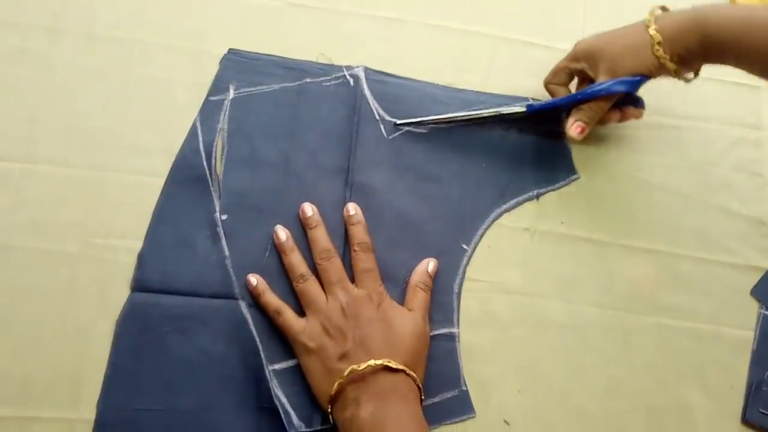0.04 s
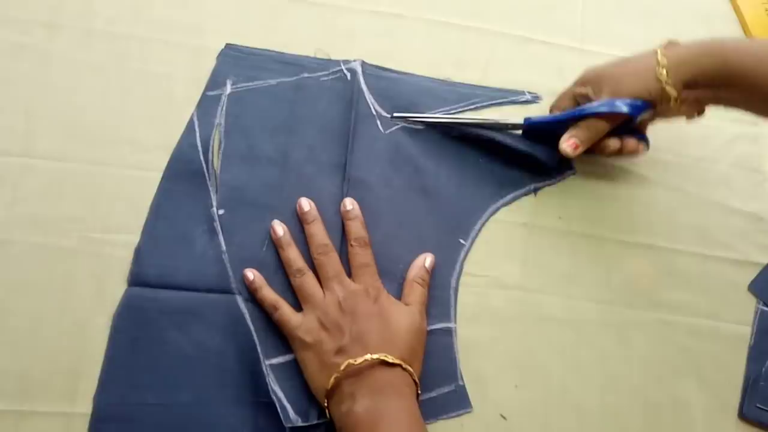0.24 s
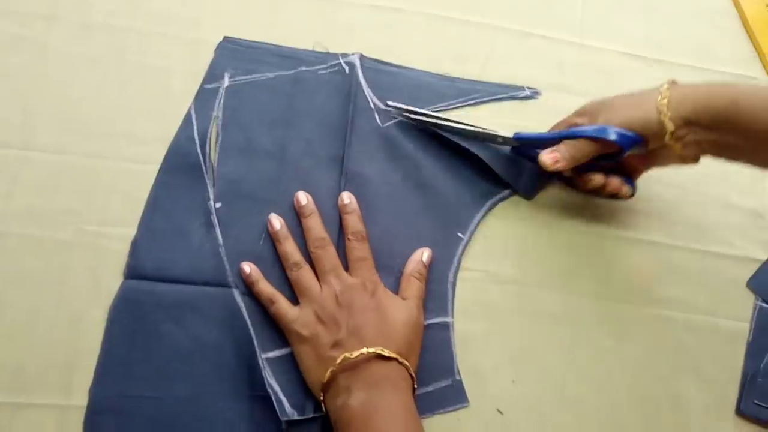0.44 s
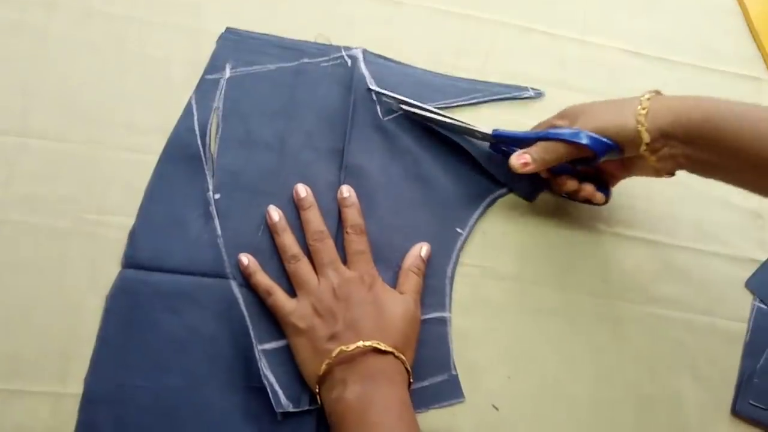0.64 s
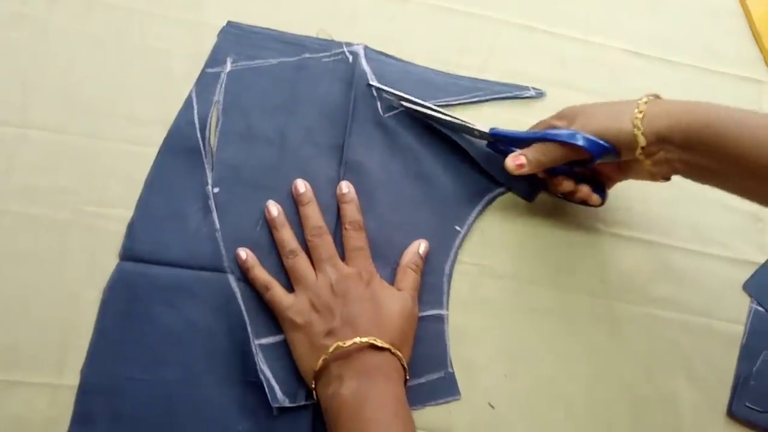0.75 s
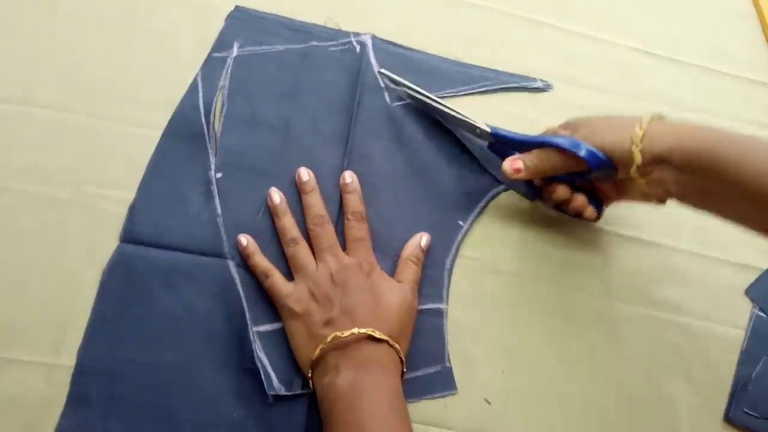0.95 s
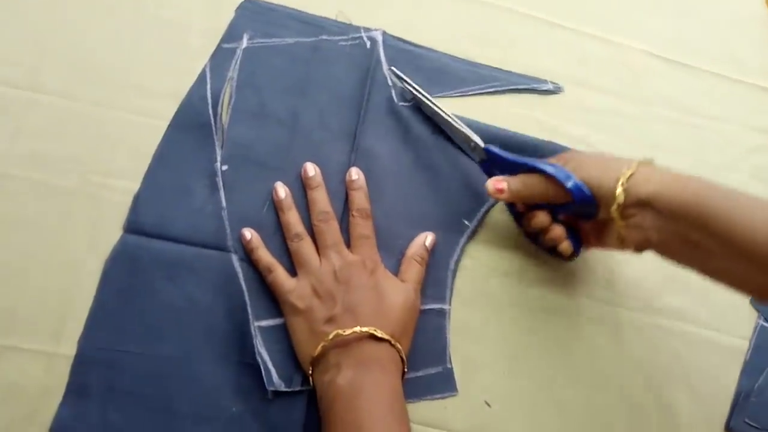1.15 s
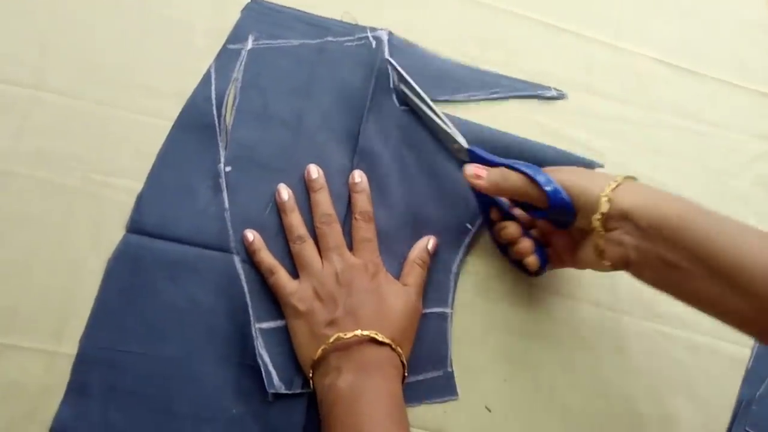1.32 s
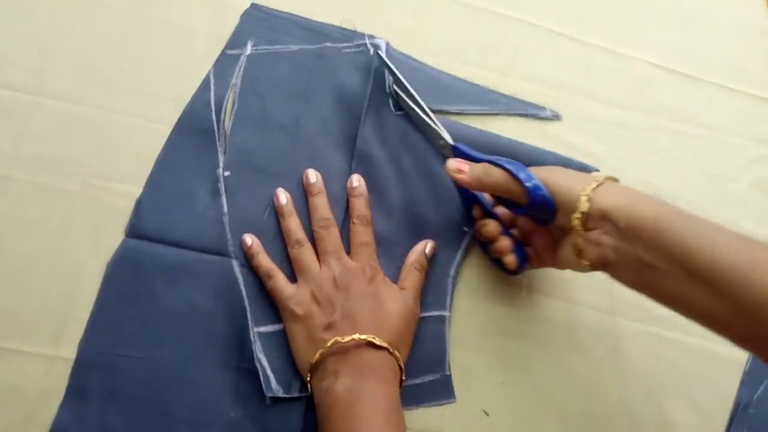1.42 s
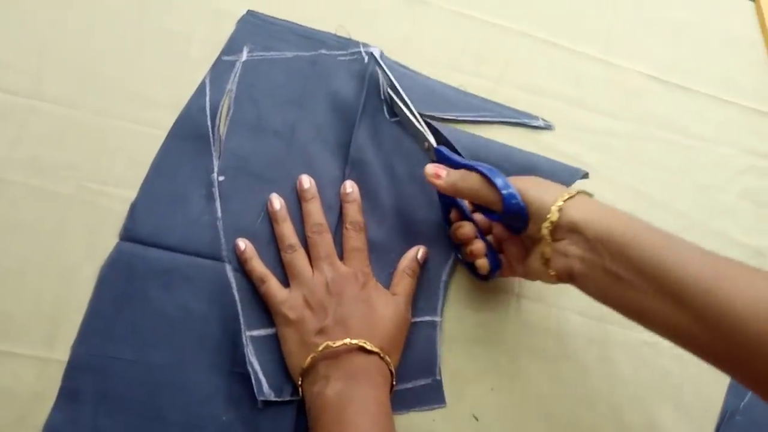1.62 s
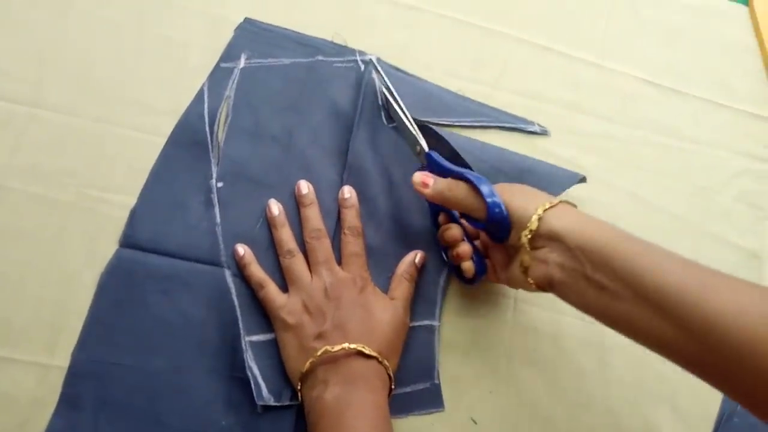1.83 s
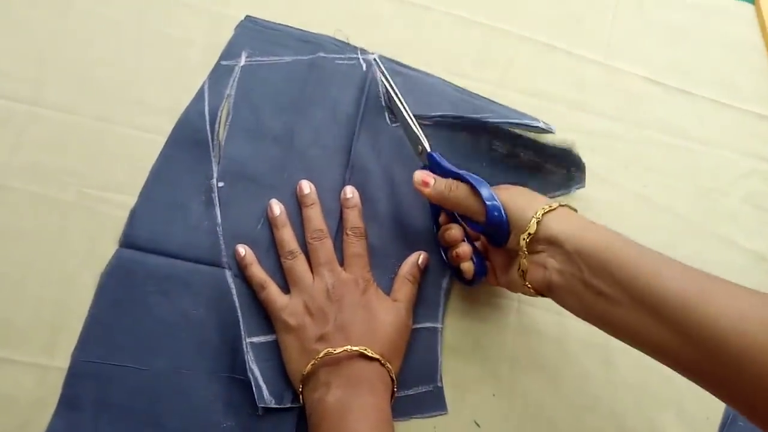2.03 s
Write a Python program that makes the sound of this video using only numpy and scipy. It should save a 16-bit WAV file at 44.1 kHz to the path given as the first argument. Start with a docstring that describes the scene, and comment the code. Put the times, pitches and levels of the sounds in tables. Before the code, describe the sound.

Scissors cutting cloth on a wooden table: a quick flurry of crunchy snips and knocks, a pause, then two more clusters with soft thumps, heard close in a quiet room over low rumble and thin hiss.

```python
"""First comes a quick flurry of crunchy snips and knocks: scissors cut cloth on a wooden table in a quiet room.
Each bite is a short burst of snapping threads that rings the steel and knocks the table top.
Hard slips tick and knock, opening blades rasp, and soft pushes thump the table; a rub and a whistle are faint.
Flickering bands of noise make the rumble of table and room and the thin hiss behind it all."""
import sys
import numpy as np
from scipy import signal
from scipy.fft import rfft, irfft
from scipy.io import wavfile
from scipy.ndimage import uniform_filter1d

SR = 44100
rng = np.random.default_rng(int(sys.argv[2]) if len(sys.argv) > 2 else 0)


def nominal_scale(level):
    """Amplitude ratio for a level in decibels (scalar or array-like)."""
    x = np.asarray(level, float) / 20
    return 10 ** x


def unload_audio(sound):
    """Save the sound as a 16-bit wav file, at the path given as the first command line argument."""
    columns = np.transpose(np.atleast_2d(sound))
    # keep every value between -1 and 1, then stretch to whole-number steps
    steps = np.round(np.clip(columns, -1, 1) * 32767)
    wavfile.write(sys.argv[1], SR, steps.astype(np.int16))


N = 91507  # length of the scene in samples

# hiss of cloth and room, part above the split: t/s, level/dB
HISS_LEVELS = [(0.0, -74), (0.44, -74.5), (0.65, -77), (0.71, -69.5), (0.9, -69.5), (1.2, -69.5),
               (1.42, -67.5), (1.65, -69.5), (1.78, -65.5), (2.07, -66.5)]
# hiss, lower edge below the split: t/s, level/dB
HISS_EDGE_LEVELS = [(0, -75), (.3, -86.5), (.42, -83.5), (.66, -84.5), (.69, -75.5), (.88, -73.5),
                    (1.2, -80), (1.3, -82), (1.35, -74.5), (1.52, -81), (1.59, -88), (1.68, -74),
                    (1.8, -71.5), (2.07, -74)]
# tone colour of the hiss: f/Hz, relative level per Hz/dB
HISS_COLOUR = [(2300, -20), (2780, -7), (3300, -13), (4000, -3), (4870, 0), (6000, -9.5), (6500, -31.5),
               (7500, -36)]
# tone colour of the microphone noise: f/Hz, relative level per Hz/dB
MIC_COLOUR = [(6000, -9), (8000, -11.5), (13000, -12), (15200, -2), (16500, -11)]
# rumble of table and room: t/s, bass level/dB, low-mid level/dB
RUMBLE_LEVELS = [(0.0, -50, -58), (0.38, -62.5, -68), (0.52, -61, -65), (0.66, -73.5, -65.5),
                 (0.76, -60.5, -60), (0.96, -56, -64.5), (1.18, -58.5, -62.5), (1.37, -59.5, -66.5),
                 (1.59, -66.5, -63.5), (1.77, -52.5, -66), (2.07, -62, -62)]
# tone colour of the rumble: f/Hz, relative level per Hz/dB
RUMBLE_COLOUR = [(30, -35), (60, -16.5), (104, -7), (135, -12.5), (200, -8), (300, -14.5), (430, -20),
                 (550, -15.5), (680, -12.5), (820, -17.5), (1100, -25.5), (1500, -31.5), (2300, -36.5)]
# cloth rubbing over the table, one row: t/s, length/s, level before flicker and fade/dB, f/Hz, width/Hz
CLOTH_RUB = (1.628, .15, -71.5, 2740, 280)
# faint high whistle: t/s, f/Hz, peak level/dB
WHISTLE_PATH = [(1.945, 14100, -100), (1.96, 14800, -91), (1.98, 15300, -96), (2.0, 14600, -94),
                (2.03, 13800, -96)]
# dull pushes of blade and hand on the table: t/s, level before a 4 dB lift/dB, f/Hz, push/s
TABLE_PUSHES = [(0.039, -45.5, 135, 0.0055), (0.296, -48, 138, 0.014), (0.824, -43.5, 101.5, 0.021),
                (0.87, -49.5, 68.6, 0.017), (1.199, -53, 82.6, 0.012), (1.242, -49.5, 72.6, 0.009),
                (1.297, -53, 78.5, 0.013), (1.33, -51, 64, 0.0063), (1.563, -54, 99, 0.014),
                (1.652, -53.5, 133, .01), (1.798, -49, 139, 0.01), (1.834, -45.5, 99, 0.019),
                (1.864, -42.5, 115.7, 0.029)]
# rasps of opening blades: t/s, length/s, level of the blade body/dB, first squeak f/Hz, last squeak f/Hz
BLADE_RASPS = [(0.362, 0.054, -67.5, 8000, 6930), (1.214, 0.074, -65, 6900, 7820)]
# hard slips of the blades: t/s, blade ring level/dB, table knock level/dB
BLADE_SLIPS = [(0.0181, -55.5, -44), (0.0227, -42.5, -34), (.030, -70, -44), (0.0471, -67, -45),
               (0.0493, -42.5, -43), (.281, -65, -44.5), (0.828, -67, -40.5), (0.854, -60.5, -46),
               (0.911, -70, -47), (1.0216, -46, -36.5), (1.0274, -52, -34), (1.0342, -46, -41),
               (1.066, -47, -48)]
# bites: t/s, length/s, blade sizzle level/dB, blade ring level/dB, table knock level/dB
BLADE_BITES = [(0.014, 0.012, -63, -48.5, -38.5), (0.0448, 0.012, -57, -48.5, -38),
               (0.072, 0.0051, -74, -78, -51), (0.141, 0.012, -55, -55, -47),
               (.277, 0.0085, -58, -54.5, -45), (0.788, 0.018, -79, -78, -52.5),
               (0.822, 0.021, -56.5, -58.5, -46.5), (0.851, 0.018, -64, -61.5, -46.5),
               (0.906, 0.014, -65.5, -62.5, -48), (0.943, 0.0061, -73, -70, -53),
               (1.005, 0.013, -62, -55.5, -44.5), (1.019, 0.014, -58, -51, -38.5),
               (1.043, 0.0051, -68, -59, -56), (1.053, 0.0085, -64, -52, -43.5),
               (1.058, 0.018, -55, -53, -43), (1.082, 0.011, -67, -63, -61),
               (1.1, 0.0065, -63, -58.5, -52.5), (1.73, 0.02, -61, -74, -52),
               (1.762, 0.0048, -63, -92, -54.5), (1.784, 0.012, -58.5, -63.5, -51.5),
               (1.803, 0.027, -67, -73, -58), (1.838, 0.0031, -57, -51, -65),
               (1.859, 0.011, -56.5, -47, -53.5), (1.876, 0.018, -58.5, -47.5, -53),
               (1.9, 0.0042, -61, -54, -50.5), (2.036, 0.0099, -93, -65, -62)]
# ways the table top, blade body and thin blade edges ring, before each strike's scatter:
# f/Hz, relative level/dB, time to fall by 60 dB/s
TABLE_MODES = [(164, -5.5, 0.11), (220, -3, 0.037), (285, 2.5, 0.083), (364, -1, 0.017), (426, 3.5, 0.046),
               (537, -4, 0.023), (680, -4, 0.053), (782, -8, 0.025), (869.4, -3, 0.041),
               (903, -20.5, 0.019), (1340, -28, 0.09)]
BODY_MODES = [(2830, -14, 0.0089), (3200, -11, 0.013), (3560, -11, 0.024), (4070, -6.5, 0.015),
              (4545, 2, 0.017), (4530, -14.5, 0.11), (4997, 3, 0.017), (5130, -9, 0.072),
              (5340, -1.5, 0.0089), (5730, -1, 0.008), (6370, -11.5, 0.039), (6390, -13.5, 0.021)]
EDGE_MODES = [(7900, -9, 0.015), (9410, -2.5, 0.0064), (10570, -2, 0.0085), (11480, 0, 0.0081),
              (12310, 1, 0.0085), (14680, 6.5, 0.0093), (15300, 4, 0.0051)]

HISS_SPLIT_HZ, RUMBLE_SPLIT_HZ = 3600, 220
MIC_DB = -94
ROOM_T60_S, ROOM_DB, ROOM_TOP_HZ = 0.34, -15.5, 6300
THUMP_T60_S = 0.078
MODE_SCATTER_DB, MODE_SCATTER = 3.5, 0.011  # spread of mode levels, and of pitch as a share of f
RING_LOW_HZ, RING_TOP_HZ, TABLE_TOP_HZ, SIZZLE_LOW_HZ = 2800, 6900, 1176, 8360
SLIP_TICK_S, SLIP_PUSH_S = 0.0013, 0.00039
SLIP_S, KNOCK_LEAD_S = 0.0031, 0.00057  # contact time for the levels; the knock comes this much early
SNAPS_PER_S, SNAP_SPREAD_DB = 2100, 3.0  # the spread is the average lift of a snap
RISE_S, FALL_S = 0.0013, 0.0039
ONSET_SHARE = 0.47  # share of the bite's swell present at its start and end
LOW_CUT_HZ, TOP_HZ = 38, 15900


def level(x, db):
    """Scale x to an average (rms) level."""
    return x * nominal_scale(db) / np.sqrt(np.mean(x ** 2))


def add(out, x, s):
    """Mix x into out from s seconds on."""
    i = int(s * SR)
    out[i:i + len(x)] += x[:len(out) - i]


def walk(rate):
    """Random levels held 1 / rate s, then smoothed twice."""
    k = int(SR / rate)
    held = np.repeat(rng.standard_normal(N // k + 1), k)
    return 1.99 * uniform_filter1d(uniform_filter1d(held, k), k)[:N]


def curve(rows, axis):
    """Join the points of one table column with straight lines over time."""
    return np.interp(np.arange(N) / SR, np.array(rows)[:, 0], np.array(rows)[:, axis])


def bandpass(x, order, low_hz, high_hz):
    """Keep only the sound between two frequencies."""
    return signal.sosfilt(signal.butter(order, [low_hz, high_hz], "band", fs=SR, output="sos"), x)


def bed(colour, split, flicker, rate):
    """Coloured noise in sixth-octave bands that flicker alone, summed below and above a split."""
    f = np.arange(N // 2 + 1) * SR / N + 1e-9
    hz, db = np.array(colour).T
    shape = nominal_scale(np.interp(np.log(f), np.log(hz), db, left=-200, right=-200))
    spec = rfft(rng.standard_normal(N)) * shape
    parts = np.zeros((2, N))
    for centre in split * 2 ** ((np.arange(-20, 22) + .5) / 6):
        if hz[0] / 1.2 < centre < hz[-1] * 1.2:
            # neighbouring bands cross-fade smoothly
            band = np.cos(np.pi / 2 * np.clip(6 * np.log2(f / centre), -1, 1)) ** 2
            parts[int(centre > split)] += irfft(spec * band, N) * nominal_scale(flicker * walk(rate))
    return parts


def hiss():
    """Thin noise of cloth and room with a lower edge that comes and goes, plus microphone noise."""
    low, high = bed(HISS_COLOUR, HISS_SPLIT_HZ, flicker=3.0, rate=24)
    mic = bed(MIC_COLOUR, 5000, flicker=-2.0, rate=20)[1]
    main = level(high, 0) * nominal_scale(curve(HISS_LEVELS, axis=1))
    edge = level(low, 0) * nominal_scale(curve(HISS_EDGE_LEVELS, axis=1))
    return main + edge + level(mic, MIC_DB)


def rumble():
    """Low murmur of the table and the room: noise whose bands flicker unevenly."""
    low, high = bed(RUMBLE_COLOUR, RUMBLE_SPLIT_HZ, flicker=3.0, rate=20)
    bass = level(low, 0) * nominal_scale(curve(RUMBLE_LEVELS, axis=1))
    low_mid = level(high, 0) * nominal_scale(curve(RUMBLE_LEVELS, axis=2))
    return bass + low_mid


def room(x):
    """The room adds a short, dull tail of decaying noise after each sound."""
    t = np.arange(SR // 2) / SR
    decay = np.exp(-np.log(1000) * t / ROOM_T60_S)
    tail = rng.standard_normal(len(t)) * decay * (t > .004)
    tail = signal.sosfilt(signal.butter(4, ROOM_TOP_HZ, fs=SR, output="sos"), tail)
    tail = tail / np.sqrt(np.sum(tail ** 2))
    return x + signal.fftconvolve(x, tail)[:N] * nominal_scale(ROOM_DB)


def rub():
    """Cloth rubs the table: a narrow hiss starts quickly, flickers and fades."""
    s, length, db, hz, width = CLOTH_RUB
    t = np.arange(N) / SR - s
    noise = bandpass(rng.standard_normal(N), 2, hz - width / 2, hz + width / 2)
    fade = np.clip(t / 0.0057, 0, 1) * np.clip(1 - t / length, 0, 1) ** .4
    return level(noise, db) * nominal_scale(2.2 * walk(40)) * fade


def whistle():
    """A thin, pure tone arches up and down in pitch."""
    t = np.arange(N) / SR
    on = (t > WHISTLE_PATH[0][0]) & (t < WHISTLE_PATH[-1][0])
    turns = np.cumsum(curve(WHISTLE_PATH, axis=1)) / SR
    return on * nominal_scale(curve(WHISTLE_PATH, axis=2)) * np.sin(2 * np.pi * turns)


def thumps():
    """A soft push swells a low table resonance, which then dies away."""
    out, t = np.zeros(N), np.arange(8192) / SR
    for s, db, hz, push in TABLE_PUSHES:
        fade = np.exp(-np.log(1000) * np.clip(t - push, 0, 1) / THUMP_T60_S)
        env = np.clip(t / 0.0053, 0, 1) * fade
        tone = np.sin(2 * np.pi * (hz * t + rng.random()))
        add(out, nominal_scale(db + 4) * env * tone, s - .005)  # the swell begins 5 ms ahead of the listed time
    return out


def ringing(modes):
    """Ring of a set of modes after one tap, struck at a slightly new place each time."""
    t, (hz, db, t60) = np.arange(8192)[:, None] / SR, np.array(modes).T
    scatter = rng.standard_normal((2, len(hz)))
    loudness = nominal_scale(db + MODE_SCATTER_DB * scatter[0])
    decay = np.exp(-np.log(1000) * t / t60)
    tones = np.sin(2 * np.pi * hz * (1 + MODE_SCATTER * scatter[1]) * t)
    return (loudness * decay * tones).sum(1)


def struck(force, modes, length, db):
    """The force rings the modes; db spreads the whole ring's energy over the contact time."""
    x = signal.fftconvolve(force, ringing(modes))
    return x * nominal_scale(db) / np.sqrt(np.sum(x ** 2) / (length * SR))


def wood(force, length, db):
    """The cloth softens the blow before it reaches the table and makes it ring."""
    soft = signal.sosfilt(signal.butter(3, TABLE_TOP_HZ, fs=SR, output="sos"), force)
    return struck(soft, TABLE_MODES, length, db)


def steel(force, length, db):
    """The blade body rings, driven only in the range around its modes."""
    return struck(bandpass(force, 3, RING_LOW_HZ, RING_TOP_HZ), BODY_MODES, length, db)


def thin(force, length, db):
    """The thin blade edges sizzle, driven by the sharpest part of the force."""
    sharp = signal.sosfilt(signal.butter(3, SIZZLE_LOW_HZ, "high", fs=SR, output="sos"), force)
    return struck(sharp, EDGE_MODES, length, db)


def rasps():
    """Steel slides on steel: noise in the blade modes plus a narrow gliding squeak."""
    out, t = np.zeros(N), np.arange(4096) / SR
    for s, length, db, first_hz, last_hz in BLADE_RASPS:
        env = np.sin(np.pi * np.clip(t / length, 0, 1)) ** 1.4
        noise = rng.standard_normal((2, 4096))
        flecks = noise[1] * np.abs(noise[1]) ** 1.8  # the strongest grains stand out
        hz = first_hz + (last_hz - first_hz) * np.clip(t / length, 0, 1)
        slow_noise = uniform_filter1d(noise[0], int(SR / 700))
        squeak = env * slow_noise * np.sin(2 * np.pi * np.cumsum(hz) / SR)
        scrape = env * flecks
        add(out, steel(scrape, length, db) + thin(scrape, length, db - 14.5), s)
        add(out, squeak * nominal_scale(db - 13) / np.sqrt(np.sum(squeak ** 2) / (length * SR)), s)
    return out


def slips():
    """One hard jolt: a short scrape in the steel and a rounded push on the wood."""
    out, t = np.zeros(N), np.arange(1024) / SR
    for s, ring_db, knock_db in BLADE_SLIPS:
        tick = rng.standard_normal(len(t)) * np.sin(np.pi * np.clip(t / SLIP_TICK_S, 0, 1))
        push = -np.sin(np.pi * np.clip(t / SLIP_PUSH_S, 0, 1))
        add(out, steel(tick, SLIP_S, ring_db), s)
        add(out, wood(push, SLIP_S, knock_db), s - KNOCK_LEAD_S)
    return out


def burst(length, rise, fall):
    """Strength of a bite: quick start, swell to the middle, exponential fall after its end."""
    t = np.arange(4096) / SR
    swell = ONSET_SHARE + (1 - ONSET_SHARE) * np.sin(np.pi * np.clip(t / length, 0, 1))
    return np.clip(t / rise, 0, 1) * swell * np.exp(-np.clip(t - length, 0, 1) / fall)


def bites():
    """Threads snap in a dense run of clicks that shakes blades and table."""
    out = np.zeros(N)
    for s, length, sizzle_db, ring_db, knock_db in BLADE_BITES:
        u = rng.random((3, 4096))
        happens = u[0] < SNAPS_PER_S / SR
        strength = nominal_scale(-SNAP_SPREAD_DB * np.log(u[1]))
        snaps = happens * strength * np.sign(u[2] - .5)  # each pushes either way
        force = (snaps + 0.15 * rng.standard_normal(4096)) * burst(length, RISE_S, FALL_S)
        blades = thin(force, length, sizzle_db) + steel(force, length, ring_db)
        add(out, blades + wood(force, length, knock_db), s)
    return out


def scene():
    """Scissors and thumps sound in the room; whistle, rub, rumble and hiss join without its tail."""
    in_room = room(bites() + slips() + rasps() + thumps())
    return (in_room + whistle() + rub() + rumble() + hiss())[None]


def roll_off(x):
    """The treble ends steeply here."""
    return signal.sosfilt(signal.butter(12, 16800, fs=SR, output="sos"), x)


def record(dry):
    """The phone cuts the deep bass and the top."""
    x = signal.sosfilt(signal.butter(4, LOW_CUT_HZ, "high", fs=SR, output="sos"), dry)
    x = signal.sosfilt(signal.ellip(8, .2, 60, TOP_HZ, fs=SR, output="sos"), x)
    return roll_off(x)


dry = scene()
out = record(dry)
unload_audio(out)
```